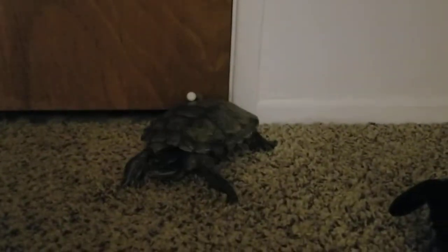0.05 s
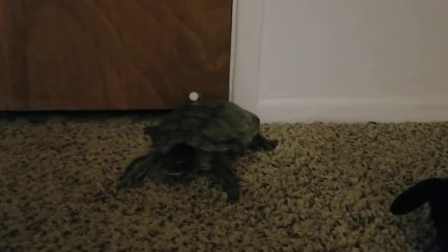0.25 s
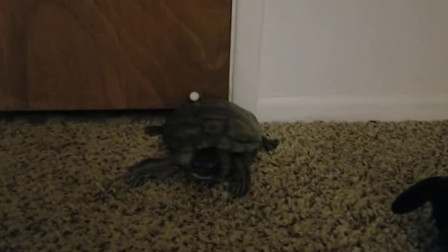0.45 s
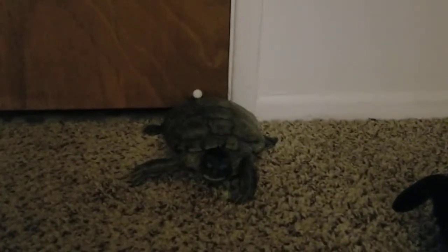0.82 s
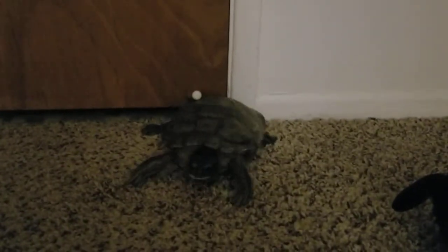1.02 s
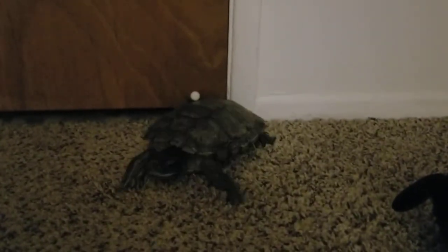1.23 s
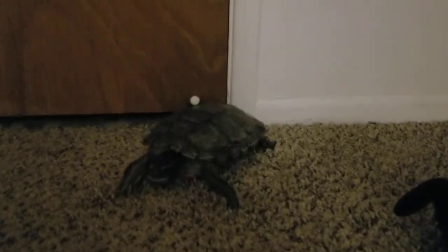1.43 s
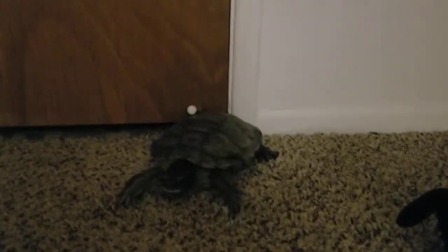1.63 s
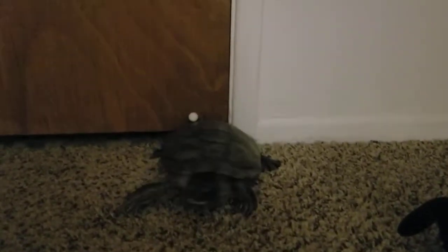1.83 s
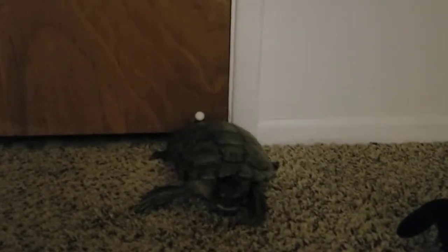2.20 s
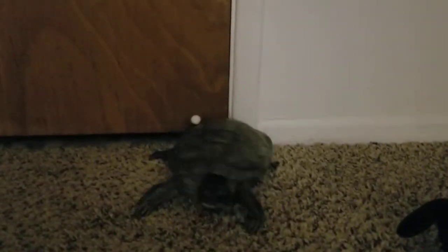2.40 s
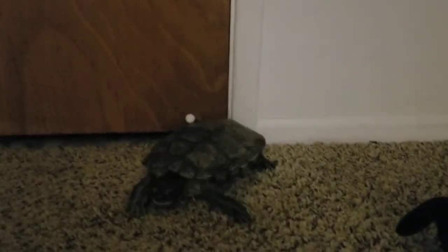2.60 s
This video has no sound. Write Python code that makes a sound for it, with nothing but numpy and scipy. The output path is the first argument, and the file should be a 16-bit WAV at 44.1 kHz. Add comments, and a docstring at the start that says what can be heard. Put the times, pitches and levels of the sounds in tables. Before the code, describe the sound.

Low thumps and rasping rubs as a turtle shoves against a door stopper in a quiet room.

```python
"""A turtle shoves its shell against a rubber-tipped door stopper in a quiet carpeted room.
Each bump makes the door boom and the stopper thrum, and the door shudders while the turtle leans.
Between bumps the shell drags over the tip in tiny slips that rasp and briefly sing, while claws and
belly rustle in the carpet. A close stereo microphone has the turtle mostly on its left and a few
light ticks on its right, over a low room hush."""
import sys
import numpy as np
from scipy import signal
from scipy.fft import rfft, irfft
from scipy.io import wavfile
from scipy.ndimage import uniform_filter1d, map_coordinates

SR = 44100
rng = np.random.default_rng(int(sys.argv[2]) if len(sys.argv) > 2 else 0)


def log_audio(samples):
    """Write samples as a 16-bit WAV file to the path given in sys.argv[1]."""
    # one column per channel
    frames = np.atleast_2d(samples).T
    # limit to full scale, then quantise
    limited = np.clip(frames, -1, 1)
    pcm = np.round(limited * 32767).astype(np.int16)
    wavfile.write(sys.argv[1], SR, pcm)


N = 121275
FFT_SIZE = 2 ** 17
HZ = np.maximum(np.arange(FFT_SIZE // 2 + 1) * SR / FFT_SIZE, 1)
TIME = np.arange(N) / SR
RASP_SLIPS_PER_S = 700


def from_db(db):
    return 10 ** (np.asarray(db) / 20)


def unit_rms(x):
    return x / np.sqrt(np.mean(x ** 2) + 1e-20)


def steady(x, samples):
    """Even out a signal to a running rms of 1."""
    return x / np.sqrt(uniform_filter1d(x ** 2, size=samples) + 1e-9)


def at_hz(points):
    """A curve read on the frequency grid."""
    hz, value = np.transpose(points)
    return np.interp(np.log(HZ), np.log(hz), value)


def envelopes(rows):
    """Each dB column of a curve as a gain in time."""
    time_s, *columns = np.transpose(rows)
    return [from_db(np.interp(TIME, time_s, db)) for db in columns]


def filtered(x, response):
    return irfft(rfft(x, FFT_SIZE) * response)[..., :N]


def colour(points, resonances=()):
    """Causal filter of unit power gain: a broad slope with resonant peaks on it."""
    gain = from_db(at_hz(points))
    for hz, width_hz, db in resonances:
        gain *= 1 + (from_db(db) - 1) / (1 + (2 * (HZ - hz) / width_hz) ** 2)
    cepstrum = irfft(np.log(unit_rms(gain) + 1e-9))
    cepstrum[1:FFT_SIZE // 2] *= 2  # fold for minimum phase
    cepstrum[FFT_SIZE // 2 + 1:] = 0
    return np.exp(rfft(cepstrum))


def clicks(start_s, level_db):
    """One click at each time, at its own level."""
    return np.bincount((np.asarray(start_s) * SR).astype(int), from_db(level_db), N)[:N]


def bursts(start_s, level_db, t60_s=0.022):
    """Envelope that jumps at each time and dies quickly."""
    decay = from_db(-60 / (t60_s * SR))
    return signal.lfilter([1], [1, -decay], clicks(start_s, level_db) + 1e-18)


def ring(x, hz, t60_s):
    """One mode: a unit click sets a sine of height 1 ringing."""
    decay, angle = from_db(-60 / (t60_s * SR)), 2 * np.pi * hz / SR
    return signal.lfilter([0, np.sin(angle)], [1, -2 * decay * np.cos(angle), decay ** 2], x + 1e-18)


def slips(per_s, spread_db, smooth_db):
    """Stick-slip: random clicks of uneven size over smooth friction, evened out to rms 1."""
    sizes = from_db(spread_db * np.minimum(rng.exponential(1, N), 4)) * rng.choice([-1, 1], N)
    catches = unit_rms(sizes * (rng.random(N) < per_s / SR))
    friction = from_db(smooth_db) * rng.standard_normal(N)
    return steady(catches + friction, samples=1500)


def soft_contact(length_s):
    """Frequency response of a force that swells and lets go."""
    force = TIME * np.exp(-TIME / (length_s / 10))
    return rfft(force / force.sum(), FFT_SIZE)


# The still room at the microphone: frequency_hz, relative_db
HUSH_COLOUR = [(15, -36.5), (25, -22), (43, -22.5), (62, 0.5), (82, -11.5), (104, -6.5), (135, -18),
               (183, -31.5), (245, -27.5), (400, -41), (850, -48), (1700, -43.5), (2500, -46),
               (5000, -52.5), (9000, -59), (11800, -47.5), (15500, -41.5)]
# How alike the hush is on the two sides: frequency_hz, correlation
HUSH_LIKENESS = [(50, 0.61), (200, 1), (600, 0.16), (2000, 0.068), (15000, 0.29)]

def hush(left_db=-57.5, right_db=-60.5):
    """Low room noise all around, and the microphone's own hiss."""
    mid, side = rfft(rng.standard_normal((2, N)), FFT_SIZE)
    alike = at_hz(HUSH_LIKENESS)
    pair = np.sqrt(1 + alike) * mid + np.sqrt(1 - alike) * side * [[1], [-1]]
    noise = irfft(pair * colour(HUSH_COLOUR))[:, :N]
    return from_db([[left_db], [right_db]]) * unit_rms(noise)


# The turtle's place, close on the left: frequency_hz, left_minus_right_db
BALANCE = [(60, 3), (200, 5), (380, 7), (700, 9), (1200, 7), (2400, 10), (4400, 6.5), (6500, 9), (9000, 0),
           (11500, -4), (14500, 2.5)]

def pan(left_lead_s=0.00006):
    """Left and right response; the sound reaches the left side a little sooner."""
    gain = from_db(at_hz(BALANCE) * [[0.5], [-0.5]])
    delay = np.exp(-2j * np.pi * HZ * left_lead_s * np.array([[0], [1]]))
    return gain / gain.mean(axis=0) * delay


# The carpeted room, heard from close to the door: frequency_hz, reflected_minus_direct_db
REFLECTIONS = [(60, -10.5), (130, -4), (260, -11), (600, -0.5), (1200, -3), (2400, -4), (8000, 0.5),
               (15000, -4.5)]

def room(x, t60_s=0.2):
    """Direct sound plus a short tail for each channel, placed to the left."""
    tail = rng.standard_normal((2, N)) * from_db(-60 * TIME / t60_s) * (TIME > 0.002)
    tail /= np.sqrt(np.sum(tail ** 2, axis=1, keepdims=True))
    wet = from_db(at_hz(REFLECTIONS))
    return filtered(x, pan() * (1 + wet * rfft(tail, FFT_SIZE)) / np.sqrt(1 + wet ** 2))


# Light ticks close to the microphone: start_s, level_db, left_minus_right_db, low_hz, high_hz
TICKS = [(1.524, -54, -13, 280, 530), (1.543, -49, -11.5, 280, 565), (1.564, -54.5, -19.5, 262, 460),
         (2.606, -68, -17, 745, 1290), (2.631, -60, -5, 700, 1790), (2.654, -57, -10, 650, 1700)]

def ticks():
    """Small dry ticks, each in a band of its own, mostly on the right."""
    out = np.zeros((2, N))
    for start_s, db, pan_db, low_hz, high_hz in TICKS:
        band = signal.butter(2, [low_hz, high_hz], "band", fs=SR, output="sos")
        tick = signal.sosfilt(band, clicks([start_s], [0]) + 1e-18)
        out += tick / np.abs(tick).max() * from_db([[db + pan_db / 2], [db - pan_db / 2]])
    return out


# The door under the turtle's weight: time_s, level_db
SHUDDER_LEVELS = [(0.0, -35.5), (0.21, -43.5), (0.26, -30), (0.3, -52), (0.33, -28), (1.11, -52.5),
                  (1.16, -70.5), (1.59, -66.5), (1.66, -27.5), (1.74, -35), (1.81, -25), (1.83, -38),
                  (2.03, -32), (2.06, -39), (2.28, -36.5), (2.33, -28.5), (2.5, -41), (2.6, -54)]
# Its deep rumble: frequency_hz, relative_db
SHUDDER_COLOUR = [(15, -17.5), (28, 1.5), (39, 16.5), (58, -2), (76, -4), (100, -13), (135, -7.5),
                  (180, -25.5), (300, -31), (800, -74.5)]

def door_shudder():
    """The door shudders as long as the turtle leans on it."""
    level, = envelopes(SHUDDER_LEVELS)
    rumble = filtered(rng.standard_normal(N), colour(SHUDDER_COLOUR))
    return level * steady(rumble, samples=5000)


def moving_contact(x, depth_db=1.5, patch_hz=900, patch_s=0.035):
    """The point of contact moves, so short-lived peaks come and go in the treble."""
    hz, time_s, frames = signal.stft(x, SR, nperseg=256)
    field = rng.standard_normal((100, 400))
    grid = np.meshgrid(hz / patch_hz, time_s / patch_s, indexing="ij")
    gain_db = depth_db * map_coordinates(field, grid, order=1, mode="mirror")
    return signal.istft(frames * unit_rms(from_db(gain_db)), SR)[1][..., :N]


# Rustle down at the carpet, in two spells: time_s, relative_db
GRIT_SPELLS = [
    [(0.0, -60.5), (0.022, -66), (0.156, -79), (0.168, -70), (0.278, -70.5), (0.338, -63), (0.408, -74),
     (0.476, -73.5), (0.526, -71.5), (0.54, -72), (0.62, -87), (0.77, -84.5), (0.97, -72), (1.206, -76),
     (1.312, -93), (1.35, -106)],
    [(1.6, -78.5), (1.636, -81), (1.646, -68), (1.676, -76), (1.73, -74), (1.862, -58.5), (1.876, -62),
     (2.07, -86.5), (2.08, -82.5), (2.222, -62.5), (2.248, -65.5), (2.266, -59), (2.5, -70), (2.548, -68.5),
     (2.684, -89), (2.72, -76.5)],
]
# Its gritty treble: frequency_hz, relative_db
GRIT_SPECTRUM = [(500, -15.5), (1500, -6), (3000, -7), (5200, -6.5), (7400, -0.5), (8600, -6.5),
                 (10400, 0.5), (13000, -0.5), (15500, -0.5)]
# Shell ridges catching, here and in shell_scrape(): start_s, crisp_db, rasp_db
RIDGE_CATCHES = [(0.042, -55, -78), (0.168, -54.5, -65), (0.206, -53, -80), (0.244, -66, -47.5),
                 (0.258, -70, -55), (0.292, -53, -66), (0.331, -62, -66), (0.341, -58, -67),
                 (0.520, -56, -69), (0.53, -63, -78), (0.963, -56.5, -67), (1.644, -77, -58),
                 (1.767, -72, -53), (1.849, -44, -49), (1.859, -52, -39.5), (2.213, -50, -65),
                 (2.263, -46, -70), (2.278, -41, -41.5), (2.285, -44.5, -61), (2.322, -52, -43.5),
                 (2.364, -52, -43.5), (2.416, -58, -49), (2.538, -61, -78)]
# Their crisp top, heard close: frequency_hz, relative_db
CRISP_COLOUR = [(1000, -17), (3000, -22.5), (5500, -13.5), (7400, 0.5), (8600, -10), (10400, 0),
                (13000, -5.5), (15500, 0.5)]

def grit(rustle_gain_db=2.5, likeness=0.12):
    """Fine grains from shell and carpet fibres, and crisp scratches; scattered, so the sides differ."""
    level, = envelopes(np.vstack(GRIT_SPELLS))
    start_s, crisp_db, _ = np.transpose(RIDGE_CATCHES)
    # Three streams of grains: left, right and common to both.
    fine = np.array([slips(per_s=2500, spread_db=2.5, smooth_db=2) for _ in range(3)])
    crisp = np.array([slips(per_s=5600, spread_db=7.5, smooth_db=-9) for _ in range(3)])
    rustle = from_db(rustle_gain_db) * filtered(level * fine, colour(GRIT_SPECTRUM))
    scratches = filtered(bursts(start_s, crisp_db) * crisp, colour(CRISP_COLOUR))
    grains = rustle + scratches
    pair = np.sqrt(likeness) * grains[2] + np.sqrt(1 - likeness) * grains[:2]
    return filtered(moving_contact(pair), np.abs(pan()))


# Thin notes from the rubbed tip: start_s, length_s, pitch_hz, width_hz, level_db
FRICTION_NOTES = [(0.0, 0.017, 2280, 111, -67), (0.02, 0.26, 2310, 110, -82), (0.126, 0.11, 1260, 110, -78),
                  (0.157, 0.042, 7100, 700, -73.5), (0.237, 0.029, 720, 160, -52.5),
                  (0.28, 0.042, 1670, 500, -64), (0.511, 0.053, 1230, 110, -69.5),
                  (0.514, 0.034, 2240, 78.5, -78), (1.639, 0.011, 4300, 2510, -63.5),
                  (1.637, 0.14, 7460, 994, -73), (1.646, 0.23, 1940, 295, -69.5),
                  (1.765, 0.14, 2300, 156, -63), (1.79, .13, 690, 71.3, -58.5),
                  (1.804, 0.063, 1160, 90, -62.5), (1.787, 0.026, 7440, 900, -63.5),
                  (2.277, 0.018, 1163, 99, -50.5), (2.279, .12, 864, 25, -56.5),
                  (2.318, 0.0077, 1780, 400, -60.5), (2.319, 0.098, 379, 55.6, -44)]

def friction_singing(attack_s=0.008, t60_s=0.053):
    """Slips feed one resonance for a moment, which then dies away."""
    out = np.zeros(N)
    for start_s, length_s, hz, width_hz, db in FRICTION_NOTES:
        friction = slips(RASP_SLIPS_PER_S, spread_db=1.5, smooth_db=-0.5)
        tone = ring(friction, hz, t60_s=np.log(1000) / (np.pi * width_hz))
        attack = np.clip((TIME - start_s) / attack_s, 0, 1)
        release = from_db(-60 * np.maximum(TIME - start_s - length_s, 0) / t60_s)
        out += from_db(db) * steady(tone, samples=2500) * attack * release
    return out


# Shell rubbing near the microphone, in two spells: time_s, body_relative_db, rasp_relative_db
RUB_SPELLS = [
    [(0.0, -51.5, -72), (0.1, -73, -105), (0.21, -66, -81), (0.232, -73, -70), (0.246, -27, -60.5),
     (0.296, -42, -63), (0.354, -39, -56.5), (0.426, -61, -74), (0.498, -55, -71.5), (0.528, -49.5, -63.5),
     (0.574, -55.5, -93), (0.678, -60, -109), (0.742, -79, -84), (0.824, -53, -87), (0.878, -55.5, -81),
     (0.904, -65, -104), (0.918, -58, -77), (0.958, -62, -81), (1.2, -83.5, -82.5)],
    [(1.35, -84, -91), (1.55, -58.5, -74), (1.62, -74, -79), (1.656, -47, -65), (1.742, -49, -72),
     (1.77, -35, -48), (1.792, -39.5, -57), (1.864, -48, -51.5), (1.976, -54.5, -74), (2.0, -49, -83),
     (2.084, -63.5, -90), (2.16, -48, -73), (2.206, -51.5, -63), (2.272, -44.5, -61), (2.278, -42.5, -55),
     (2.334, -43.5, -52.5), (2.424, -55, -66), (2.466, -52.5, -78), (2.6, -67, -75.5)],
]
# Resonances of shell and stopper, also heard in the clack: pitch_hz, width_hz, boost_db
SHELL_RESONANCES = [(303.7, 9.7, 8.5), (381, 4.7, 2), (422, 17, 5), (460, 7.2, 11), (700, 31, 4.5),
                    (866, 7.3, 2.5), (1136, 76, 7.5), (1757, 36, 3), (2320, 25, 14.5), (2685, 170, 6)]
# The low body of the scrape: frequency_hz, relative_db
BODY_SPECTRUM = [(60, -31), (130, -2), (230, 2.5), (330, -1.5), (470, -10.5), (560, -19), (720, -19.5),
                 (1000, -36), (3000, -70.5)]
# The rasp above it: frequency_hz, relative_db
RASP_SPECTRUM = [(250, -39.5), (540, -4.5), (700, 2.5), (1100, -5), (1500, -7), (2100, -9.5), (3000, -16.5),
                 (6000, -22), (15000, -81)]

def shell_scrape(body_gain_db=-2, rasp_gain_db=-3.5):
    """The shell drags over the tip: coarse slips sound its body, finer ones rasp, harder at a catch."""
    body_level, rasp_level = envelopes(np.vstack(RUB_SPELLS))
    start_s, _, catch_db = np.transpose(RIDGE_CATCHES)
    rasp_level = np.hypot(from_db(rasp_gain_db) * rasp_level, bursts(start_s, catch_db))
    coarse = slips(per_s=500, spread_db=3.5, smooth_db=-10.5)
    fine = slips(RASP_SLIPS_PER_S, spread_db=3, smooth_db=-5.5)
    body = filtered(body_level * coarse, colour(BODY_SPECTRUM, SHELL_RESONANCES))
    rasp = filtered(rasp_level * fine, colour(RASP_SPECTRUM, SHELL_RESONANCES))
    return from_db(body_gain_db) * body + rasp


# The hard shell's knock at close range: frequency_hz, relative_db
CLACK_SPECTRUM = [(60, -9.5), (180, -13.5), (350, -3.5), (600, 4.5), (1100, -39.5), (2000, -35),
                  (4000, -32.5), (8000, -30), (15000, -33)]

def shell_clack(hits, crunch_db=-23, t60_s=0.06):
    """Each hit sends a click and a short crunch through the shell's resonances."""
    crunch = from_db(crunch_db - 60 * TIME / t60_s) * rng.standard_normal(N)
    impact = 0.5 * (TIME == 0) + crunch
    shell = colour(CLACK_SPECTRUM, SHELL_RESONANCES)
    shell /= np.abs(irfft(shell)).max()  # a unit click peaks at 1
    return filtered(filtered(hits, rfft(impact, FFT_SIZE)), shell)


# The stopper's two bending modes: pitch_hz, t60_s
STOPPER_MODES = [(96.3, 0.45), (254, 0.42)]
# The door's modes: pitch_hz, gain_db, t60_s
DOOR_MODES = [(39.6, -37, 0.83), (56.3, -5.5, 1), (72.9, 2.5, 0.34), (121.6, -1.5, 0.26), (130, -21.5, .2),
              (151, -23.5, 0.11), (193.3, -7, 0.13), (221.1, -11, .2), (296.4, -30, 0.12),
              (353, -29.5, 0.1), (450, -19.5, 0.29)]
# The shell bumps or slips off the stopper, close on the left; how hard each part is driven:
# start_s, door_db, stopper_low_db, stopper_upper_db, clack_db
SHELL_BUMPS = [(0.045, -45, -62, -52, -74), (0.169, -48, -41, -61, -57), (0.243, -26.5, -34, -35.5, -38),
               (0.255, -28.5, -28, -66, -58), (0.329, -30.5, -34.5, -41, -40), (0.372, -32, -29, -50, -63),
               (0.445, -74, -32, -37, -54), (0.519, -33.5, -25.5, -33, -48), (0.831, -52.5, -74, -49, -69),
               (0.868, -46, -76, -50, -67), (1.643, -62, -60, -62, -76), (1.654, -34, -21.5, -46, -68),
               (1.716, -56, -32.5, -41.5, -75), (1.759, -32.5, -46, -30, -37), (1.778, -52, -56, -26, -54),
               (1.846, -30, -22.5, -30.5, -30), (1.866, -44, -23.5, -36, -54),
               (1.909, -56, -26.5, -80, -73), (2.000, -32, -43, -45, -65), (2.146, -42.5, -60, -46, -70),
               (2.28, -44, -36.5, -36, -38), (2.322, -36, -39, -60, -30), (2.411, -37, -50, -41, -44),
               (2.463, -41.5, -65, -43, -63), (2.652, -42, -44.5, -54.5, -71)]

def shell_bumps(contact_s=0.0034, shove_s=0.011):
    """The rubber tip softens each bump into door and stopper; the hard shell adds a clack."""
    start_s, door_db, low_db, upper_db, clack_db = np.transpose(SHELL_BUMPS)
    door = sum(ring(clicks(start_s, door_db + db), hz, t60_s) for hz, db, t60_s in DOOR_MODES)
    (low_hz, low_t60_s), (upper_hz, upper_t60_s) = STOPPER_MODES
    low_mode = ring(clicks(start_s, low_db), low_hz, low_t60_s)
    upper_mode = ring(clicks(start_s, upper_db), upper_hz, upper_t60_s)
    boom = filtered(door + upper_mode, soft_contact(contact_s))
    shove = soft_contact(shove_s)
    shove /= np.interp(low_hz, HZ, np.abs(shove))  # slows the low mode's onset but keeps its level
    thrum = filtered(low_mode, shove)
    return boom + thrum + shell_clack(clicks(start_s, clack_db))


def scene():
    """Shell, stopper and door sound through the room; grit and ticks reach the microphone dry."""
    at_the_door = shell_bumps() + shell_scrape() + friction_singing() + door_shudder()
    return room(at_the_door) + grit() + ticks() + hush()


def record(dry, low_cut_hz=54.4, high_cut_hz=15850):
    """The deepest bass is rolled off and the top is cut off steeply."""
    low_cut = signal.butter(3, low_cut_hz, "high", fs=SR, output="sos")
    high_cut = 1 / np.sqrt(1 + (HZ / high_cut_hz) ** 300)
    return filtered(signal.sosfilt(low_cut, dry), high_cut)


dry = scene()
out = record(dry)
log_audio(out)
```